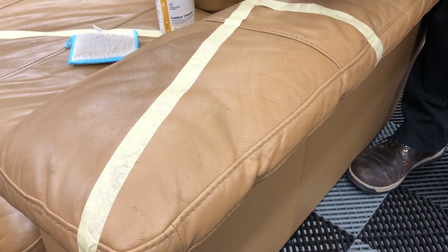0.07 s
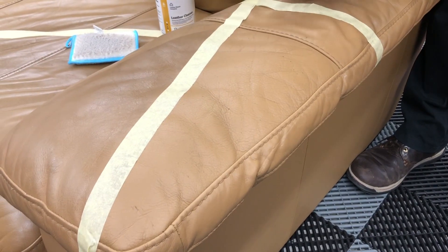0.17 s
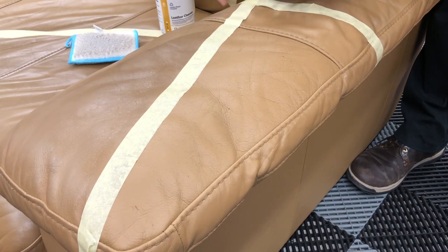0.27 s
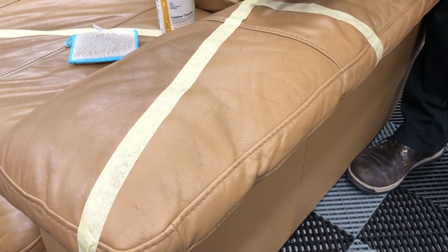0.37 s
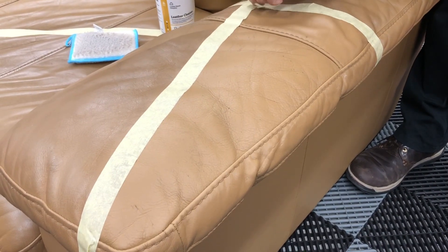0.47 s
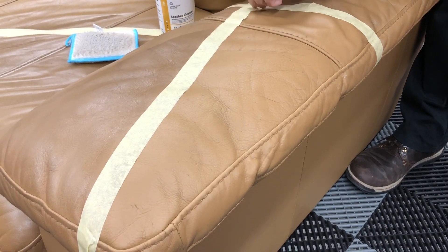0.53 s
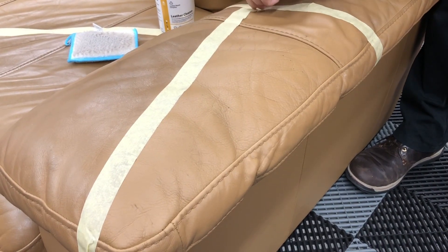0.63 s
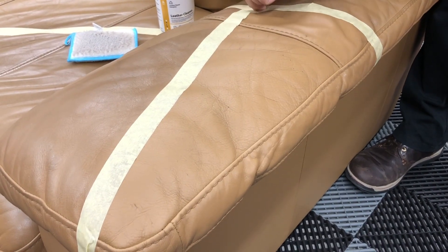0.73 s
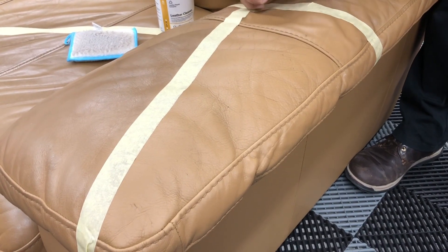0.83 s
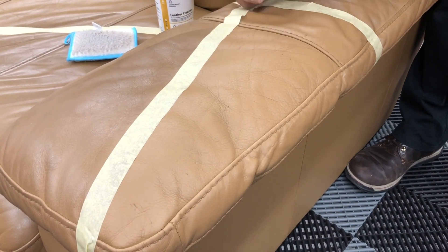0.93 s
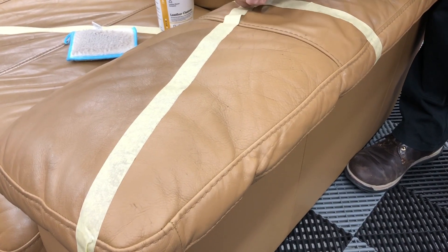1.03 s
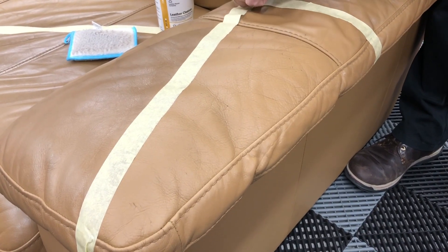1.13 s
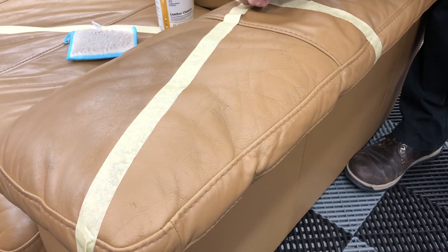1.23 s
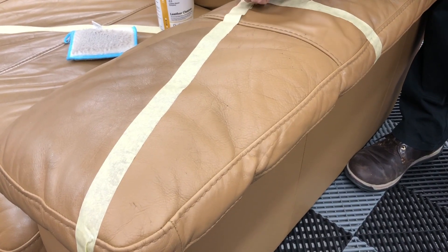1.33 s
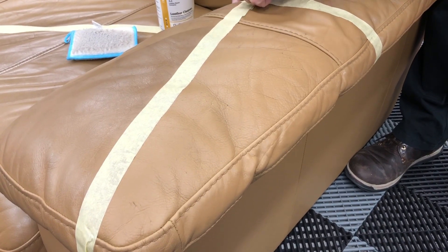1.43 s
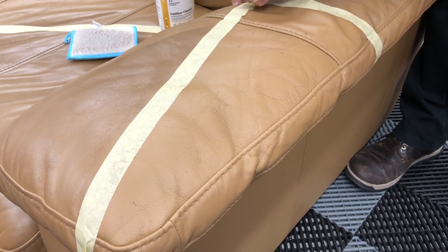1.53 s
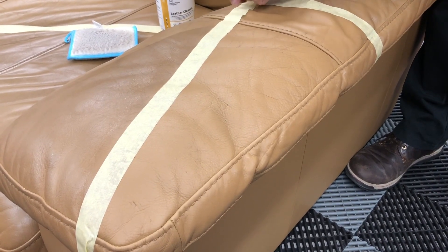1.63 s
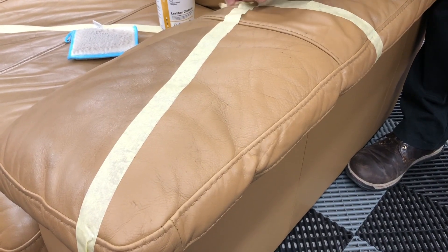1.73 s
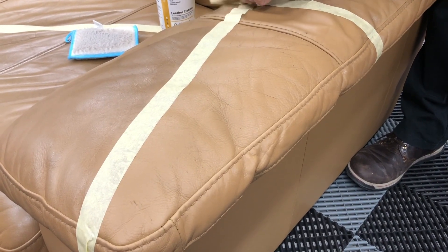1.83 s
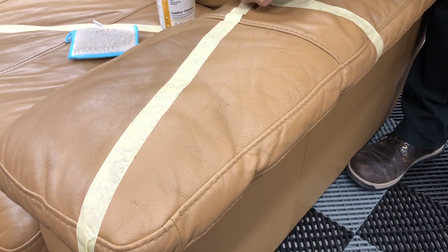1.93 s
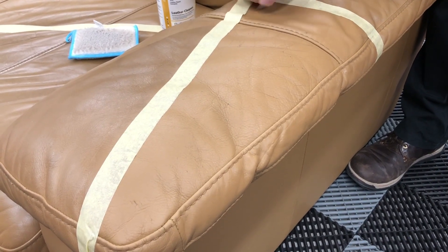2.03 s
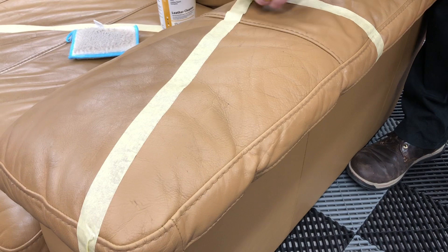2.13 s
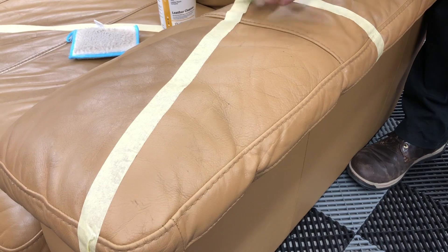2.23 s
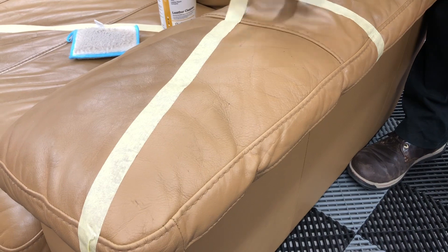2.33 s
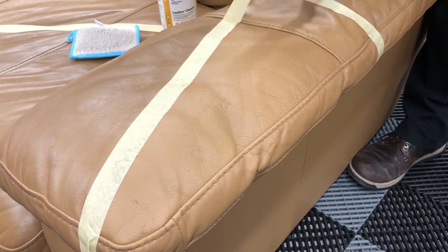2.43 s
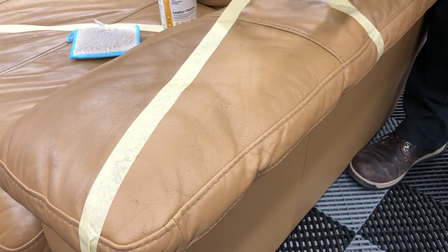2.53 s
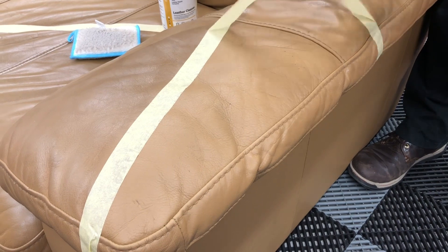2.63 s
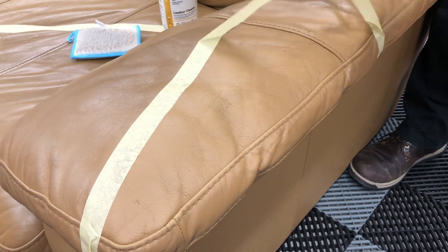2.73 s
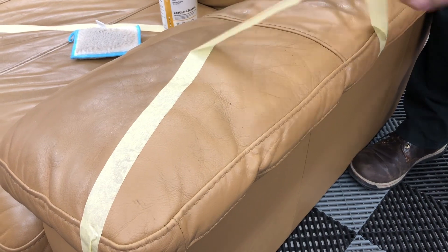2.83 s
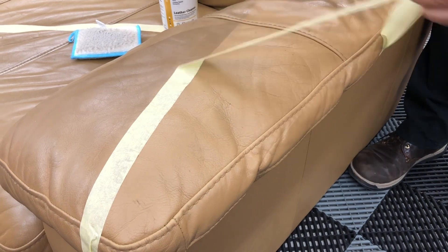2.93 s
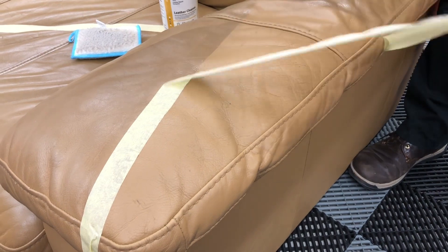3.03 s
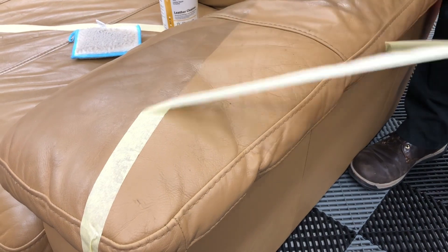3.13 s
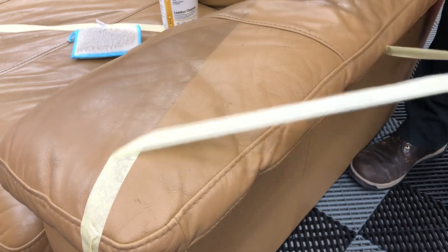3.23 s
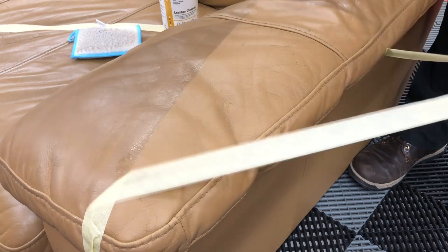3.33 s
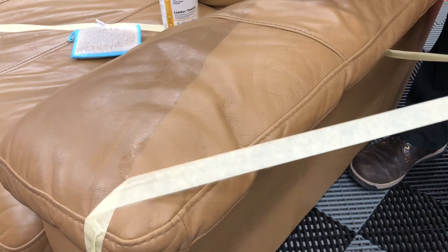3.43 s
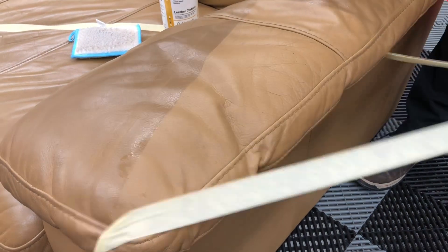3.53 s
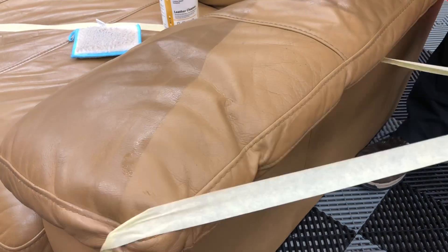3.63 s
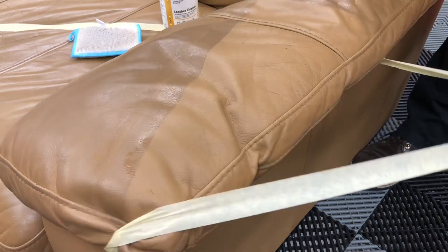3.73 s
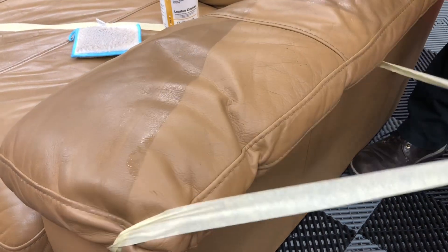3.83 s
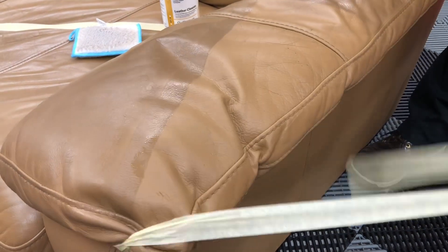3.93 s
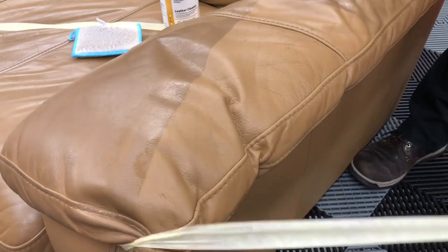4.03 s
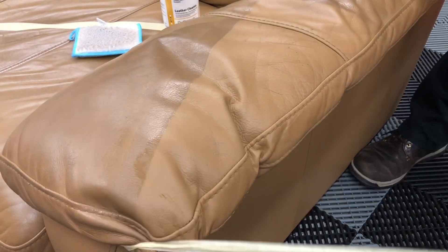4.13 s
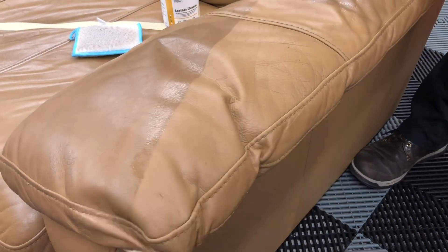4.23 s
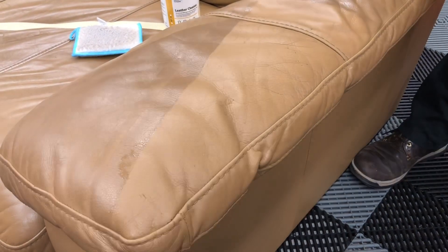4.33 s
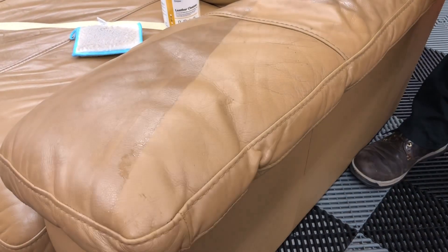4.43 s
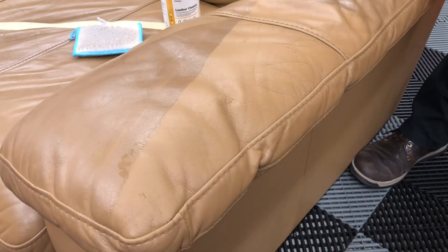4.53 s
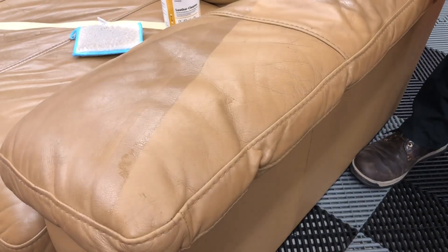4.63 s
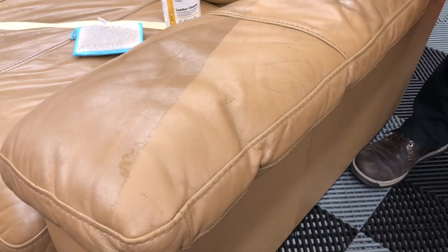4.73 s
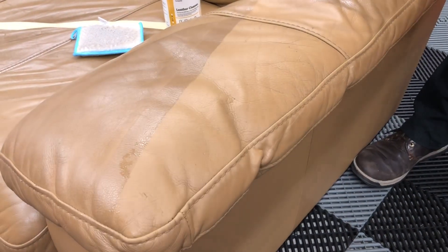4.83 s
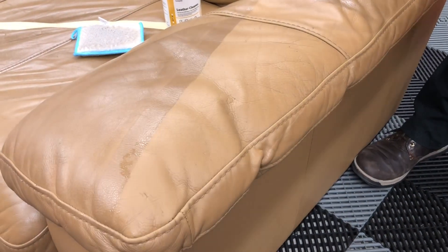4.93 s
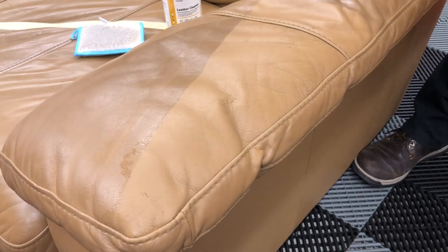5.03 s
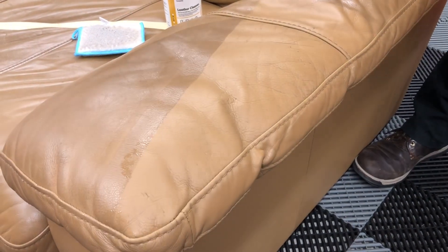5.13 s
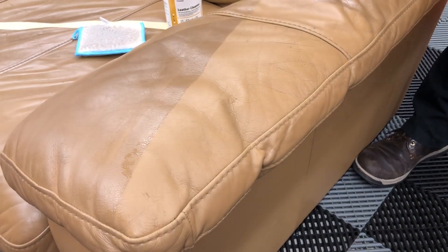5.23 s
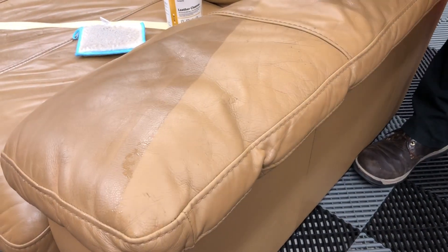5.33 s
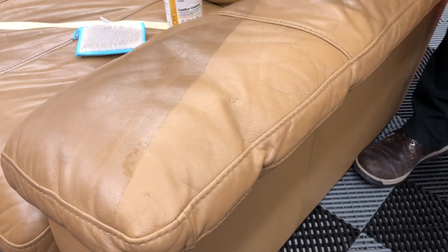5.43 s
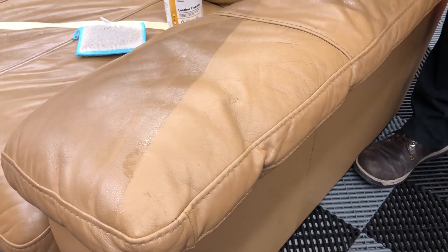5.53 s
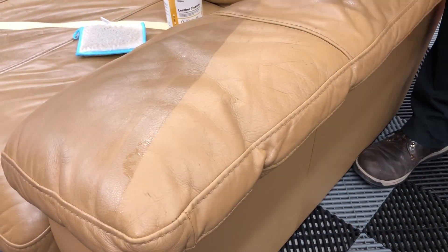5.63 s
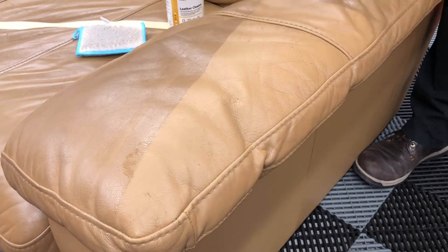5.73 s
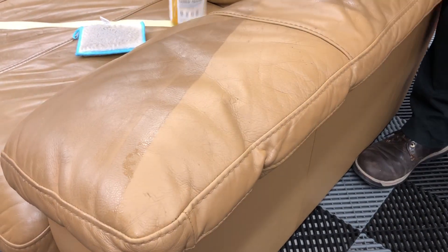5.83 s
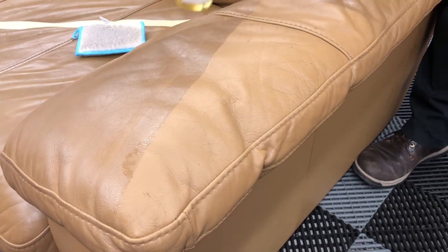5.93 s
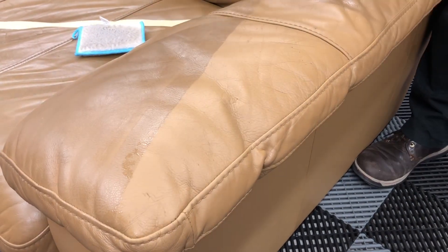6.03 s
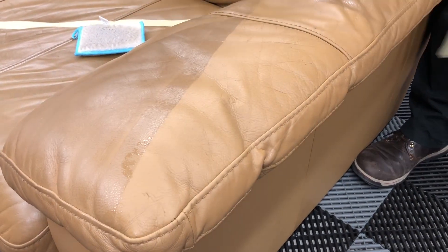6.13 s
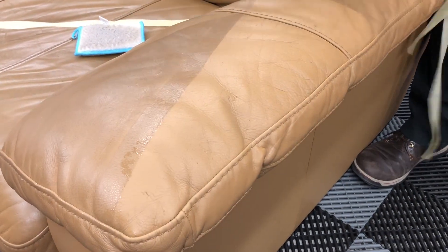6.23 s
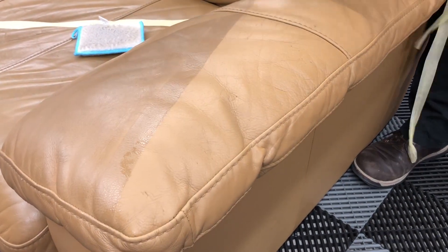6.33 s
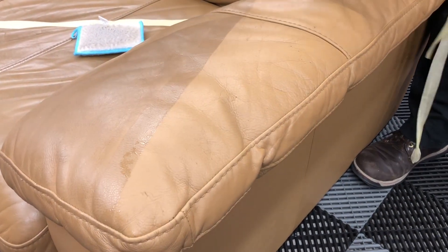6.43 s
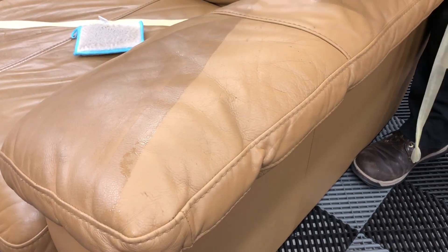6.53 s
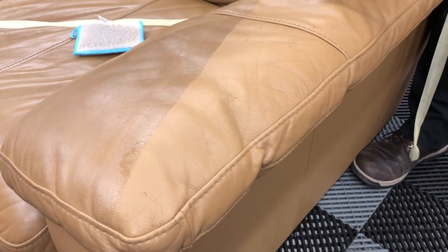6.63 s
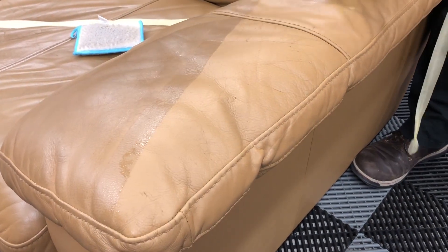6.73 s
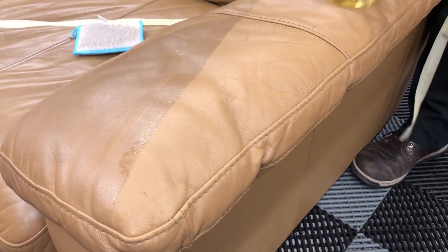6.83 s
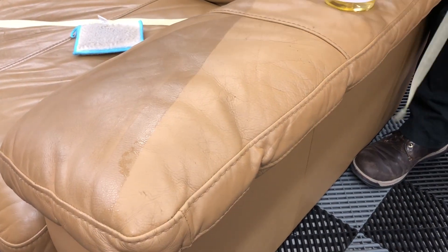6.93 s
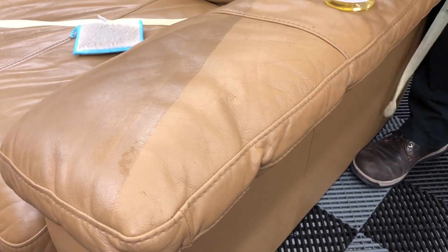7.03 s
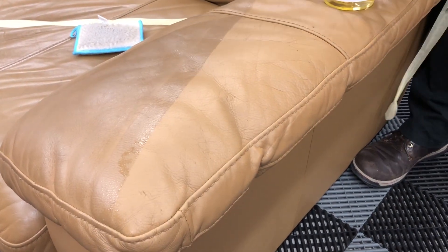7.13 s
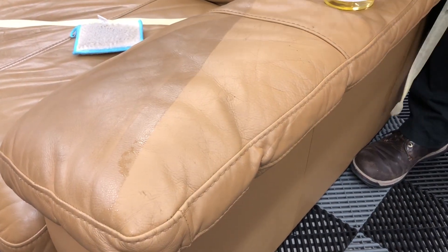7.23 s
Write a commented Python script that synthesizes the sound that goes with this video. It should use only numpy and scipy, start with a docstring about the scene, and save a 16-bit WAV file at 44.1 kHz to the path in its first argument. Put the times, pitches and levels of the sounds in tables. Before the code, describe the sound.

A soft rumble fills a quiet, furnished room throughout. For the first 1.6 seconds, fingertips pick at masking tape on a leather cushion, making faint ticks and rustles while a low hum comes and goes. From about 1.6 to 3.4 seconds the tape peels off close by in three tugs, a sticky, crackling rip with sharp little snaps, growing brighter as the pull speeds up. Beneath it the cushion thuds, the leather drums and the taut tape drones slightly. The last lengths tear free in short rips with low twangs, in a cluster around 3.5 seconds and again near 3.9 and 4.3 seconds. After that the loose tape rustles and crackles softly in the hands, with one more small rip and twang at about 5.5 seconds, a few crinkles just after, and fading clicks until around 7.3 seconds.

```python
"""Masking tape peeled off a leather cushion in a quiet, furnished room, over a soft rumble.
0-1.6 s: fingertips pick at the tape; a low hum comes and goes.
1.6-3.4 s: the glue lets go in thousands of tiny slips, brighter as the pull speeds up; the cushion
thuds, its skin drums, the taut tape drones. The last lengths tear free in short rips and twangs.
Then the loose tape rustles and crackles in the hands until 7.3 s."""
import sys
import numpy as np
from scipy import signal
from scipy.fft import rfft, irfft
from scipy.io import wavfile
from scipy.ndimage import uniform_filter1d

SR = 44100
rng = np.random.default_rng(int(sys.argv[2]) if len(sys.argv) > 2 else 0)


def transcribe(signal):
    """Save signal, clipped to [-1, 1], as a 16-bit WAV file at the path in sys.argv[1]."""
    frames = np.atleast_2d(signal).T
    limited = np.clip(frames, -1, 1)
    pcm = np.round(limited * 32767).astype(np.int16)
    wavfile.write(sys.argv[1], SR, pcm)


N = 321489

# the pull, in three tugs: t/s, level/dB
PULL = [(1.6, -81), (1.642, -49), (1.714, -41.5), (1.775, -45.5), (1.844, -38), (1.89, -41.5), (1.956, -44),
        (2.05, -55.5), (2.08, -44.5), (2.148, -40), (2.218, -34), (2.298, -36.5), (2.34, -39),
        (2.351, -62.5), (2.358, -38), (2.418, -40.5), (2.5, -36), (2.6, -37), (2.84, -40.5), (2.87, -35.5),
        (3.052, -40), (3.228, -35.5), (3.276, -40), (3.35, -46.5), (3.385, -58.5)]
# short rips: t/s, rise/s, fall/s, level/dB, change/(dB per octave away from the tape's body pitch, either
# side), drumming/dB re level
SHORT_RIPS = [(2.735, .005, 0.0037, -30, -4.5, -23.5), (2.774, 0.0092, 0.0023, -34, 2.5, -31),
              (2.857, 0.0027, 0.011, -30.5, -1, -23), (2.92, 0.0016, 0.0037, -28, -1.7, -18),
              (3.349, 0.0018, 0.00073, -46, 6, 3), (3.361, 0.0027, 0.0018, -46, 5, -1),
              (3.466, 0.0023, 0.0018, -34.5, 1.5, -2.5), (3.49, .001, 0.00058, -25, -1.5, 3),
              (3.493, 0.0063, 0.0052, -39, 1.7, -19.5), (3.512, 0.0012, 0.0039, -43.5, 4, 10.5),
              (3.516, 0.0052, 0.01, -33, 2.5, -3), (3.539, 0.0034, 0.023, -38.5, 1.9, -3.5),
              (3.563, 0.0028, 0.0019, -42, -4, -2), (3.575, 0.0043, 0.0036, -27, .5, -5.5),
              (3.885, 0.0111, 0.0027, -21.5, -1.7, -7.5), (4.269, 0.00096, 0.015, -49, 4, 7),
              (4.279, 0.015, 0.0096, -37, 2.5, -13), (4.295, 0.014, 0.0019, -23.5, -5, -9.5),
              (5.051, 0.0096, 0.0019, -46.5, 1.7, -23), (5.523, 0.0025, 0.0076, -36.5, -2, -7.5),
              (5.529, 0.0033, 0.0014, -33.5, -1, -11)]
CRACK_TAIL_S = 0.0011


def from_db(db):
    return 10 ** (np.asarray(db) / 20)


def unit_rms(x):
    return x / np.sqrt(np.mean(x ** 2) + 1e-20)


def in_time(rows):
    """A gate, open while the curve lasts, then its columns per sample."""
    times, *columns = np.transpose(rows)
    t = np.arange(N) / SR
    gate = uniform_filter1d(((t >= times[0]) & (t <= times[-1])) * 1., size=200, mode="nearest")
    return [gate] + [np.interp(t, times, column) for column in columns]


def at_hz(rows, hz, column=1):
    """Read a spectrum on a log axis."""
    rows = np.array(rows)
    return np.interp(np.log(hz), np.log(rows[:, 0]), rows[:, column])


def octaves_off(hz, centre_hz):
    return np.abs(np.log2(hz / centre_hz))


def bump(hz, centre_hz, reach_oct):
    """Triangle: 1 at the centre, 0 from reach_oct away."""
    return np.clip(1 - octaves_off(hz, centre_hz) / reach_oct, 0, 1)


def drift(rate_hz):
    """Noise through a double one-pole low-pass, rms 1."""
    r = np.exp(-2 * np.pi * rate_hz / SR)
    return unit_rms(signal.lfilter([1], [1, -2 * r, r * r], rng.standard_normal(N + SR))[SR:])


def resonance(x, hz, width_hz):
    """Two-pole band-pass, peak gain 1."""
    r = np.exp(-np.pi * width_hz / SR)
    feedback = [1, -2 * r * np.cos(2 * np.pi * hz / SR), r * r]
    return signal.lfilter(np.array([1, 0, -1]) * (1 - r * r) / 2, feedback, x)


def band(x, low_hz, high_hz):
    sos = signal.butter(2, [low_hz, min(high_hz, .47 * SR)], "band", fs=SR, output="sos")
    return signal.sosfilt(sos, x)


def bursts(starts_s, rises_s, falls_s, levels_db):
    """Summed envelopes: tension builds, lets go, and the level dies away."""
    out = np.zeros(N)
    for start_s, rise_s, fall_s, db in zip(starts_s, rises_s, falls_s, levels_db):
        rise = np.linspace(0, 1, int(rise_s * SR)) ** 1.5
        fall = np.exp(-np.arange(int(5 * fall_s * SR)) / (fall_s * SR))
        shape, i = np.r_[rise, fall], round(start_s * SR)
        out[i:i + len(shape)] += from_db(db) * shape
    return out


def by_speed(slow, fast, power=1):
    """A value that moves from slow to fast with the pulling speed."""
    # t/s, speed/(0 slow to 1 fast)
    speed = [(1.6, 0.049), (1.95, 0.077), (2.15, 0.12), (2.3, 0.26), (2.45, 0.11), (2.55, 0.54),
             (2.75, 0.67), (2.95, 0.59), (3.1, 0.87), (3.2, 0.85), (3.3, 0.76), (3.39, 0.7)]
    return slow + (fast - slow) * in_time(speed)[1] ** power


def room_tone():
    """Soft rumble: shaped noise, a little quieter at the end."""
    # f/Hz, density/dB
    spectrum = [(15, -11), (25, -5), (64, 3.5), (217, -5), (263, -3), (384, -10.5), (591, -12.5),
                (911, -12.5), (1230, -16.5), (1610, -15.5), (2280, -27), (12200, -43.5), (14800, -36),
                (16000, -45)]
    # t/s, level/dB
    levels = [(0, -57.5), (5.6, -57), (7.29, -60.5)]
    hz = np.maximum(np.arange(N // 2 + 1) * SR / N, 1)
    rumble = unit_rms(irfft(rfft(rng.standard_normal(N)) * from_db(at_hz(spectrum, hz)), N))
    return from_db(in_time(levels)[1] + 2) * rumble


def hum(hz=63.5):
    """Low hum that comes and goes: a sine roughened by narrow noise."""
    # t/s, level/dB
    levels = [(0.0, -47.5), (0.17, -50), (0.44, -46.5), (0.596, -71), (0.67, -51), (0.82, -58),
              (1.1, -52.5), (1.238, -57), (1.314, -44), (1.4, -56), (1.52, -78)]
    gate, db = in_time(levels)
    rough = unit_rms(resonance(rng.standard_normal(N), hz, width_hz=14))
    return gate * from_db(db) * (1.2 * np.sin(2 * np.pi * hz * np.arange(N) / SR) + 0.21 * rough)


def reverb(x, onset_s=0.0083):
    """Diffuse room tail: noise dying away in half-octave bands."""
    # f/Hz, level/dB, t60/s
    decay = [(150, -17, 0.32), (510, -19.5, 0.89), (1460, -21, 1), (3780, -25, 0.72), (7660, -26.5, 0.55),
             (15000, -26, 0.14)]
    t, tail = np.arange(int(.8 * SR)) / SR, 0
    for low_hz in 100 * 2 ** np.arange(0, 7.4, .5):
        hz = 1.19 * low_hz
        db, t60_s = at_hz(decay, hz), at_hz(decay, hz, column=2)
        noise = band(rng.standard_normal(len(t)), low_hz, low_hz * np.sqrt(2))
        tail += noise * from_db(db - 24 - 60 * t / t60_s)
    return signal.fftconvolve(x, tail * np.clip(t / onset_s, 0, 1) ** 2)[:N]


def twangs():
    """Taut tape twangs free or a hand bumps the cushion: dying sines, wavering in level."""
    # t/s, level/dB, f/Hz, t60/s
    rings = [(3.582, -32, 182, 0.21), (3.9, -41, 185.4, 0.33), (4.303, -24, 510, 0.026),
             (4.309, -34.5, 155, 0.13), (5.533, -35.5, 293.7, 0.14), (0.716, -42.5, 260, 0.055),
             (1.259, -47, 228, 0.09), (3.515, -29, 440, 0.061), (6.823, -41.5, 484, 0.032),
             (6.823, -46, 900, 0.022), (6.823, -47, 180, 0.061)]
    out, waver = np.zeros(N), from_db(3.8 * drift(60))
    for start_s, db, hz, t60_s in rings:
        t = np.arange(N - round(start_s * SR)) / SR
        envelope = from_db(db - 60 * t / t60_s) * (1 - np.exp(-t / 0.001))
        out[-len(t):] += envelope * np.sin(2 * np.pi * hz * t)
    return out * waver


def snaps():
    """Single snaps of glue or paper: a click and a short noisy tail, broadly pitched."""
    # t/s, peak/dB, f/Hz, broad crack/dB re pitched part
    events = [(0.2743, -27.5, 8700, 31), (0.557, -48, 3810, -2), (0.6776, -52, 3920, -8),
              (0.6907, -47, 3500, -2), (0.7238, -48, 12000, -6), (0.822, -34, 3600, 20),
              (0.935, -38, 4340, -2), (0.9806, -35.5, 4000, 4), (1.0052, -37.5, 3700, -3),
              (1.1448, -45, 4790, -1), (1.293, -49, 3710, 8), (1.4115, -51, 2470, -20),
              (1.6787, -20.5, 6600, 18), (1.709, -30, 3970, -10), (1.824, -22, 12000, -13),
              (1.8385, -24, 4760, -2), (1.9102, -19, 3880, -4), (1.9303, -20, 4460, -17),
              (2.08, -25, 4280, 10), (2.1014, -24, 4430, -9), (2.1123, -17.5, 3320, 8),
              (2.2284, -20, 3080, -1), (2.393, -18, 4530, -1), (3.5028, -14, 7000, -13),
              (3.5126, -17.5, 7000, -5), (3.7816, -34, 14900, -2), (4.101, -32.5, 11300, -24),
              (4.646, -44.5, 9990, -8), (4.818, -46, 3080, 4), (4.8835, -41, 3250, -11),
              (4.9228, -35, 4530, 10), (5.2418, -35, 4540, 9), (5.3887, -42, 4210, 4),
              (5.6263, -38, 3900, -13), (5.6497, -31, 4300, 16), (5.7823, -33.5, 2730, -27),
              (5.8286, -29, 2370, -28), (5.9086, -37.5, 3260, -10), (5.944, -33.5, 3150, -17),
              (6.12, -49, 1500, -8), (6.168, -43, 3460, -17), (6.1964, -46, 2660, -28),
              (6.21, -39, 2800, -25), (6.4313, -47.5, 3000, -2), (6.796, -42, 2420, -3),
              (6.8207, -41, 1450, -32), (6.9058, -38.5, 3220, -28), (7.0354, -44.5, 8930, 3)]
    out, length = np.zeros(N), int(.01 * SR)
    for start_s, db, hz, crack_db in events:
        noise = rng.standard_normal(length)
        burst = 0.36 * noise * np.exp(-np.arange(length) / (CRACK_TAIL_S * SR))
        burst[0] = np.sign(noise[0])
        pitched = unit_rms(resonance(burst, hz, .55 * hz))
        click = pitched + from_db(crack_db) * unit_rms(band(burst, 830, 6.7 * hz))
        i = round(start_s * SR)
        out[i:i + length] += from_db(db) * click / np.abs(click).max()
    return out


def drone(hz=445, width_hz=110):
    """At a fast pull the taut tape drones: narrow noise."""
    pulling, pull_db = in_time(PULL)
    narrow = resonance(resonance(rng.standard_normal(N), hz, width_hz), hz, width_hz)
    return pulling * from_db(pull_db + by_speed(-39, -4.5)) * unit_rms(narrow)


def cushion(thud_hz=110, thud_width_hz=70):
    """The tugged cushion thuds; its skin drums at a pitch that rises as the tape pulls it tighter."""
    # t/s, level/dB re pull
    thud = [(1.6, -7), (1.95, -12), (2.15, -10.5), (2.34, 0), (2.5, -1.5), (2.65, -1.5), (2.78, -9),
            (2.88, 1), (2.97, -37), (3.22, -24), (3.33, 9), (3.385, 7)]
    pulling, pull_db = in_time(PULL)
    *timing, rip_db, _, drum_db = np.transpose(SHORT_RIPS)
    white = rng.standard_normal((3, N))
    tugs = pulling * from_db(pull_db + in_time(thud)[1]) + bursts(*timing, rip_db + drum_db + 0.5)
    knocks = resonance(tugs * white[2], thud_hz, thud_width_hz)
    out = from_db(19) * resonance(knocks, thud_hz, thud_width_hz)
    skin_db, skin_hz = by_speed(-15, -6, power=1.37), by_speed(257, 470, power=1.37)  # tightens late
    edges_hz = 70 * 2 ** np.arange(0, 3.7, 1 / 3)
    for k, (low, high) in enumerate(zip(edges_hz, edges_hz[1:])):
        hz = np.sqrt(low * high)
        level = pulling * from_db(pull_db + skin_db - np.minimum(8.8 * octaves_off(hz, skin_hz), 11))
        level += bursts(*timing, rip_db + drum_db - 7.5 - 5 * octaves_off(hz, 400))
        out += band(level * white[k % 2], low, high) * np.sqrt(SR / 2 / (high - low))
    return out


def rubbing_level(hz):
    """Fingertips rub loose tape: a broad spectral hill with a slight paper ring on top."""
    # t/s, level/dB, brightest f/Hz
    handling = [(0.0, -48.5, 6600), (0.07, -63.5, 6450), (0.25, -73, 5060), (0.39, -65, 4660),
                (0.55, -76, 4470), (0.84, -74, 4750), (1.02, -58, 4350), (1.13, -83, 4430),
                (1.6, -70.5, 4260), (3.385, -55, 7000), (3.7, -59.5, 5270), (4.0, -53, 4350),
                (4.2, -68.5, 4280), (4.34, -48.5, 4400), (4.66, -71, 3800), (4.9, -63, 3900),
                (5.1, -57, 4630), (5.21, -69.5, 3970), (5.44, -65, 4340), (5.6, -54.5, 4450),
                (5.87, -66.5, 3150), (6.2, -66, 3170), (6.6, -75.5, 3600), (6.8, -68, 3200),
                (7.29, -76, 3620)]
    _, db, peak_hz = in_time(handling)
    return from_db(db - 5.5 * octaves_off(hz, peak_hz) + 0.5 * bump(hz, peak_hz, 0.21))


def rustle_level(hz, rise_share=0.53):
    """The paper creases in soft rustles; duller ones are narrower."""
    # t/s, length/s, level/dB, brightest f/Hz
    creases = [(.172, .012, -66, 5000), (0.266, 0.04, -52.5, 4900), (0.38, 0.026, -60.5, 6460),
               (0.463, .014, -67, 6860), (0.588, 0.02, -56.5, 9000), (0.679, 0.0088, -58, 5000),
               (0.861, 0.03, -63.5, 11000), (0.897, 0.067, -54.5, 4180), (1.026, 0.15, -68, 4500),
               (1.157, 0.022, -69, 8000), (3.811, 0.0064, -52, 8130), (3.825, 0.013, -46.5, 7000),
               (3.856, 0.0087, -46, 7970), (3.864, 0.015, -43, 4020), (4.17, 0.029, -54.5, 8000),
               (4.24, 0.015, -61, 13100), (4.925, 0.047, -52.5, 11000), (5.008, 0.015, -48, 4870),
               (5.114, 0.023, -49, 5070), (5.188, 0.026, -51.5, 2800), (5.237, 0.018, -57, 9100),
               (5.3, 0.027, -49.5, 5050), (5.642, 0.037, -43.5, 3160), (5.794, 0.02, -59, 3000),
               (5.816, 0.0092, -42, 2700), (5.832, .011, -34.5, 2570), (6.16, 0.068, -64, 3380),
               (6.42, 0.035, -67, 5000), (6.897, 0.051, -62, 3300)]
    start_s, length_s, db, peak_hz = np.transpose(creases)
    slope_db_per_oct = 3 * (5000 / peak_hz) ** 1.74
    band_db = db - slope_db_per_oct * octaves_off(hz, peak_hz)
    return bursts(start_s, rise_share * length_s, (1 - rise_share) * length_s, band_db)


def rip_level(hz, body_hz=5000 * 2 ** -0.65):
    """Short lengths tear free, each peaked or hollowed around the tape's body pitch: the level changes by the
    same dB per octave on either side."""
    *timing, db, tilt_db_per_oct, _ = np.transpose(SHORT_RIPS)
    return bursts(*timing, db + tilt_db_per_oct * octaves_off(hz, body_hz))


def peel_level(hz, ref_hz=5000):
    """The tugs of the peel; a faster pull is brighter."""
    pulling, pull_db = in_time(PULL)
    octaves = np.log2(hz / ref_hz)
    mids_db = by_speed(-3, -1) * np.clip((-octaves - 0.7) / 0.5, 0, 1)
    body_db = by_speed(-1.5, -0.5) * bump(hz, 0.48 * ref_hz, 0.69)
    sheen_db = by_speed(-3, 6.5) * bump(hz, 1.6 * ref_hz, 0.69)
    dip_db = by_speed(-1, -2) * bump(hz, 2.1 * ref_hz, 0.36)
    treble_db = by_speed(-10.5, 8, power=0.91) * np.clip((octaves - 0.8) / 0.74, 0, 1)
    return pulling * from_db(pull_db + mids_db + body_db + sheen_db + dip_db + treble_db)


def cracks(per_s=680):
    """Larger patches of glue break: sharp clicks with short noisy tails."""
    clicks = from_db(1.1 * np.minimum(rng.exponential(1, N), 3.2)) * (rng.random(N) < per_s / SR)
    tails = signal.lfilter([1], [1, -np.exp(-1 / (CRACK_TAIL_S * SR))], clicks)
    return unit_rms(clicks * rng.choice([-1, 1], N) + 0.38 * tails * rng.standard_normal(N))


def slips(spread_db, per_s=3500):
    """The glue line slips: random clicks, mostly small, a few large."""
    sizes = from_db(spread_db * np.minimum(rng.exponential(1, N), 4.2)) * rng.choice([-1, 1], N)
    return unit_rms(sizes * (rng.random(N) < per_s / SR))


def tape():
    """Slips and cracks, coloured by the tape, shaped per band into peel, rubbing, rips and rustles."""
    # f/Hz, density/dB
    spectrum = [(590, -7), (1000, -4), (1990, -5), (3010, -7), (3330, -2.5), (4190, -4.5), (8840, -4.5),
                (10100, -4.5), (12200, -5.5), (15500, -3.5)]
    hands_only = 1 - in_time(PULL)[0]
    uneven_db = by_speed(3.5, 0.5)  # slips clump more at a slow pull
    clumps = from_db(uneven_db * (1.21 * drift(680) + 0.28 * drift(68)))
    clumps /= from_db(0.1 * uneven_db ** 2)  # holds the mean level
    fidget = from_db(0.5 * drift(45) + 0.99 * drift(250))
    rub_waver = from_db(2.5 * drift(23))
    common = slips(spread_db=8.5) + from_db(0.62 * uneven_db - 3.5) * cracks()
    alternating = [slips(spread_db=4.5), slips(spread_db=1)]
    out, edges_hz = np.zeros(N), 700 * 2 ** np.arange(0, 4.7, 1 / 3)
    for k, (low, high) in enumerate(zip(edges_hz, edges_hz[1:])):
        hz = np.sqrt(low * high)
        level = clumps * peel_level(hz) + rip_level(hz)
        level += fidget * (hands_only * rub_waver * rubbing_level(hz) + rustle_level(hz))
        colour = from_db(at_hz(spectrum, hz) + 10 + 1.83 * drift(45))
        clicks = 0.26 * common + 0.78 * alternating[k % 2]
        out += colour * band(level * clicks, low, high)
    return out


def scene():
    """Tape and cushion in the room, mono."""
    near = tape() + cushion() + drone() + snaps() + twangs()
    return (near + reverb(near) + room_tone() + hum())[None]


def record(dry):
    """The microphone drops the deepest bass; the top is cut steeply."""
    low_hz, high_hz = 40, 15750
    thin = signal.sosfilt(signal.butter(4, low_hz, "high", fs=SR, output="sos"), dry)
    return signal.sosfilt(signal.ellip(12, .5, 70, high_hz, fs=SR, output="sos"), thin)


dry = scene()
out = record(dry)
transcribe(out)
```